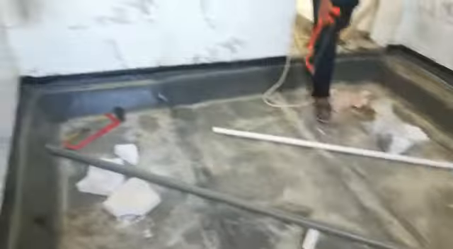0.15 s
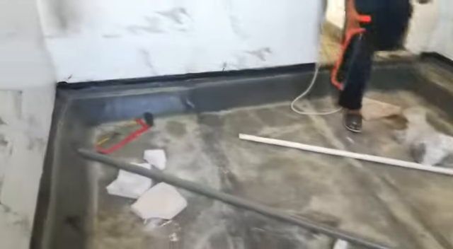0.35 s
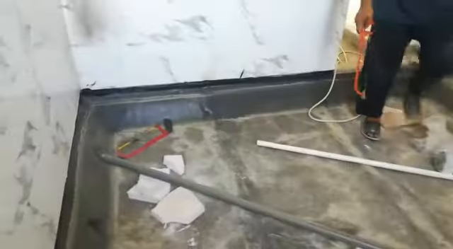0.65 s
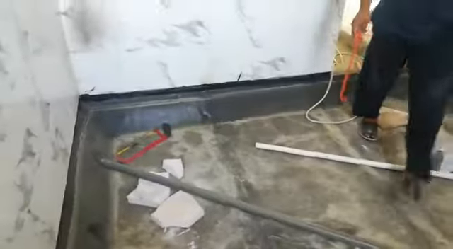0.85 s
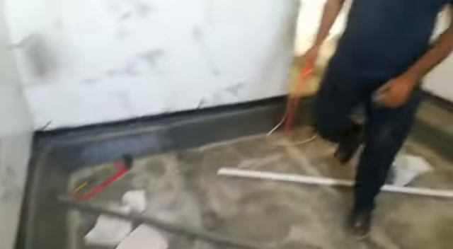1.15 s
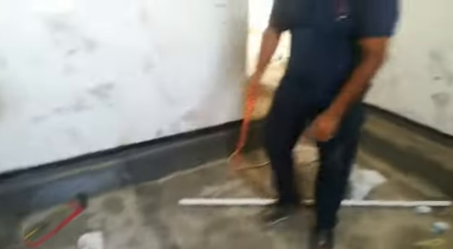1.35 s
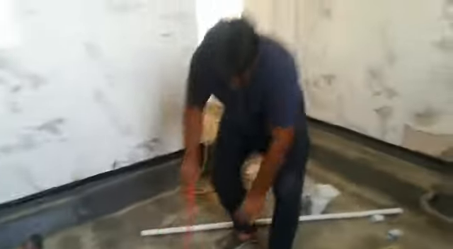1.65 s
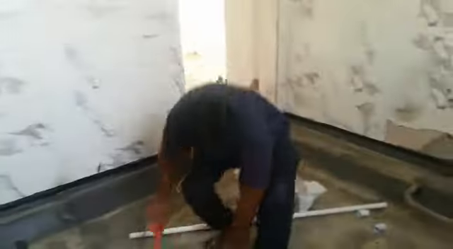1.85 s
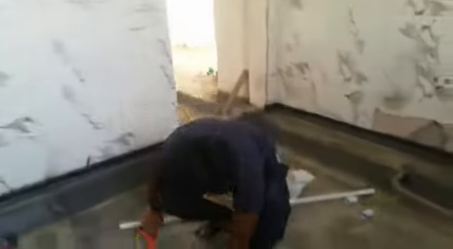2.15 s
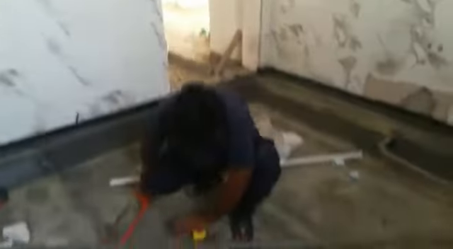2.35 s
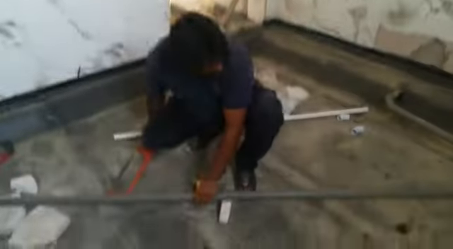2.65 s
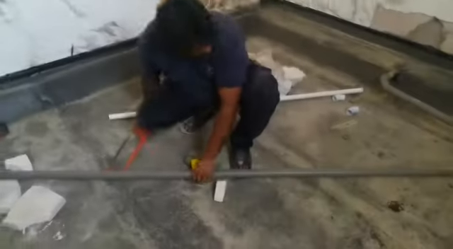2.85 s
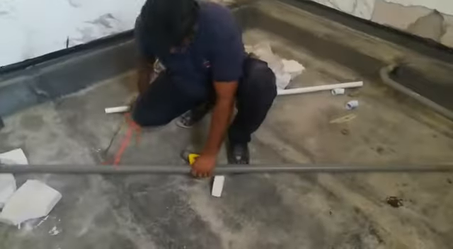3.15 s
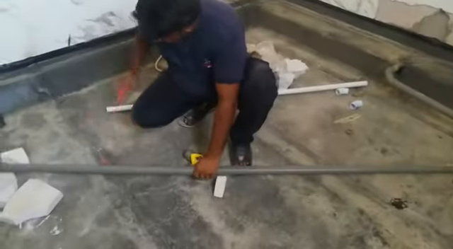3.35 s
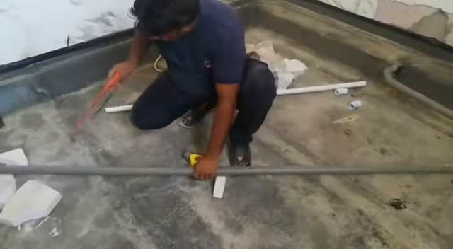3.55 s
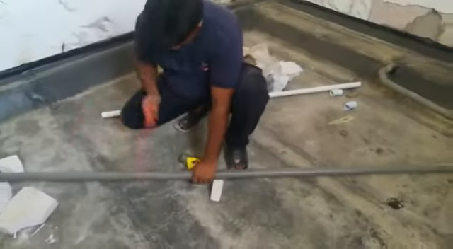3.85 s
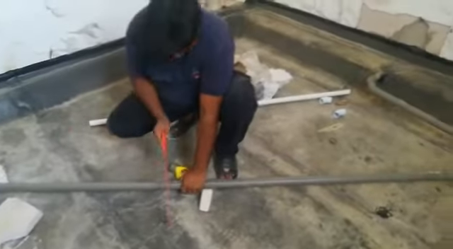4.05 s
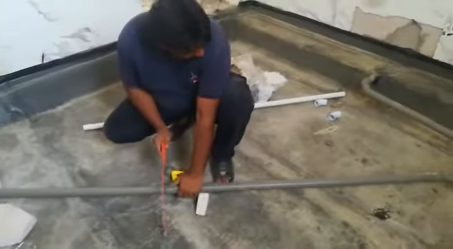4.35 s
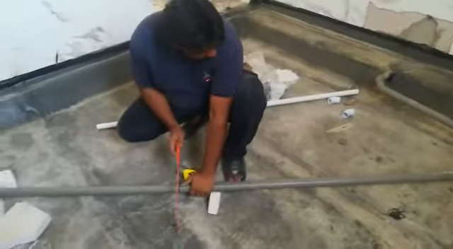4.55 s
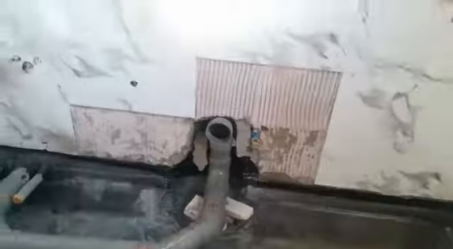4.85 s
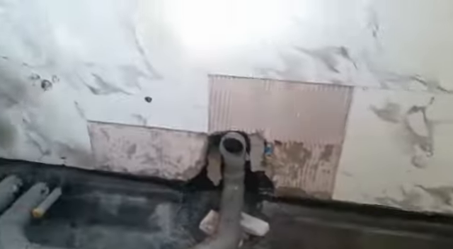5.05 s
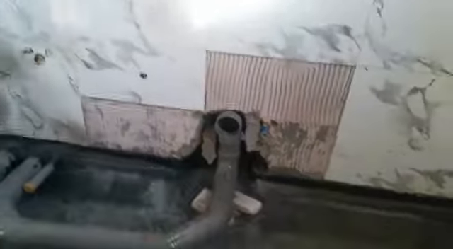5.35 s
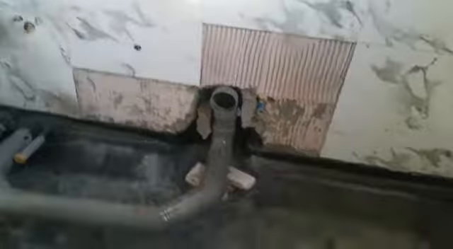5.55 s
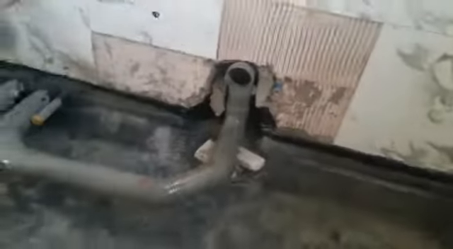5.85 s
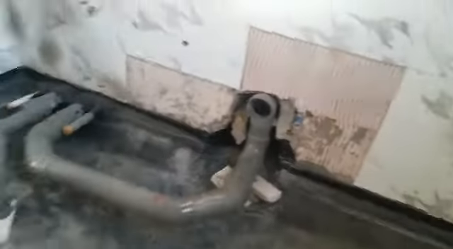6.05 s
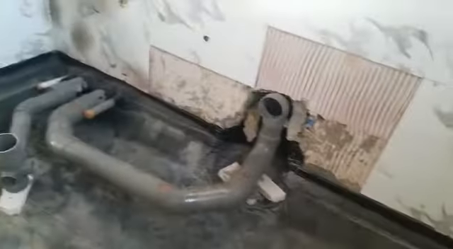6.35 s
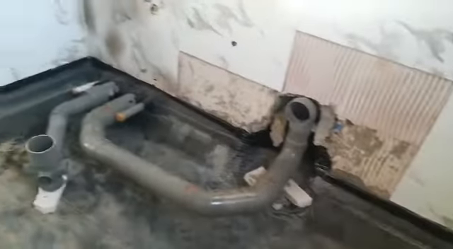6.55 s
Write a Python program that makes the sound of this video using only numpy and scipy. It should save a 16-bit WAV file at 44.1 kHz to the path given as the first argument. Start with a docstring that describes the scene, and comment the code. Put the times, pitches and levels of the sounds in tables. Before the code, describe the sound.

Loud hollow plastic clatter comes first, ringing through an empty hard-walled room. After a short lull, irregular footsteps and knocks grow crisper and nearer. Then come a dull pipe thump with light metal taps, a brief singing slide of saw teeth, and two more taps. Near the end the echo shortens and the hum drops; soft microphone bumps lead to dry scrapes, the strongest close to the end. Handheld microphone with faint rumble.

```python
"""A long plastic pipe lands, bounces and chatters on the concrete floor of a bare, echoing room; a worker
then steps up and handles it, his hacksaw slides and is set on the pipe, and soft bumps and scrapes follow.
Blows are short filtered pulses with reflections and echo; pipe, saw frame and blade ring in decaying modes.
Scrapes, chatter and sliding teeth are random trains of ticks; cloth, hum and booms are shaped noise."""
import sys
import numpy as np
from scipy import signal
from scipy.fft import rfft, irfft
from scipy.io import wavfile

SR = 44100
rng = np.random.default_rng(int(sys.argv[2]) if len(sys.argv) > 2 else 0)


def file_out(sig):
    """Save sig as 16-bit WAV at sys.argv[1]."""
    # one column per channel
    cols = np.atleast_2d(sig).T
    # limit, then scale
    lim = np.clip(cols, -1, 1)
    pcm = np.round(lim * 32767).astype(np.int16)
    wavfile.write(sys.argv[1], SR, pcm)


N = 295029
TIME = np.arange(N) / SR   # s
AGE = TIME[:SR]   # s since the start of one sound
NARROW_FROM_S = 4.55   # from here on the sounds come from a tighter corner with a shorter echo


def from_db(db):
    """Amplitude ratio: 20 dB is a factor of ten in pressure."""
    return 10 ** (np.asarray(db) / 20)


def rms_one(x):
    """Normalisation to unit root-mean-square amplitude."""
    return x / np.sqrt(np.mean(x ** 2) + 1e-20)


def at_hz(points, hz):
    """Interpolation on a logarithmic frequency axis, on which equal musical intervals are equally wide."""
    known, values = np.transpose(points)
    return np.interp(np.log(np.maximum(hz, 1)), np.log(known), values)


def add(out, s, sound):
    """Superposition: a stereo sound is summed in from time s."""
    start = max(0, round(s * SR))
    out[:, start:start + sound.shape[1]] += sound[:, :N - start]


def pulse(*spectra, size=4096):
    """Minimum phase: folding the cepstrum gives a causal pulse with the summed dB spectra."""
    hz = np.fft.rfftfreq(size, 1 / SR)
    spectrum_db = sum(at_hz(points, hz) for points in spectra)
    cepstrum = irfft(np.log(from_db(spectrum_db)))
    cepstrum[1:size // 2] *= 2
    cepstrum[size // 2 + 1:] = 0
    return irfft(np.exp(rfft(cepstrum)))


def through(x, response):
    """Linear filtering: convolution with an impulse response, keeping the whole tail."""
    return signal.fftconvolve(np.atleast_2d(x), np.atleast_2d(response), axes=1)


def contact(touch, weight_db, hard_db):
    """Contact mechanics: a heavier touch excites more of the lows, a harder one more of the highs."""
    bass, body, edge, treble = touch
    # share of the weight that reaches 1 kHz, and of the hardness that reaches 4 kHz
    body_share, edge_share = 0.8, 0.49
    return tint(bass + weight_db, body + body_share * weight_db, edge + edge_share * hard_db, treble + hard_db)


def tint(bass_db, body_db, edge_db, treble_db):
    """Spectral balance: four levels stand beside a fixed one near 2 kHz, as (Hz, dB) points."""
    mid_db = -10.5
    return [(450, bass_db), (800, body_db), (1250, body_db), (1800, mid_db), (2400, mid_db),
            (3100, edge_db), (4500, edge_db), (7000, treble_db)]


def resonance(hz, lift_db, width):
    """Resonance: one broad peak, as (Hz, dB) points."""
    return [(hz / (1 + width), 0), (hz, lift_db), (hz * (1 + width), 0)]


def spread(mid_side):
    """Spatial coherence: two close microphones hear a diffuse field alike only in the bass."""
    # stereo width of the diffuse field: f/Hz, side over mid/dB
    side_over_mid = [(30, -31.5), (60, -27), (125, -18.5), (250, -12.5), (500, 2.5), (1000, -1.5),
                     (4000, 1), (12000, 1)]
    side = through(mid_side[1], pulse(side_over_mid))[0, :mid_side.shape[1]]
    return mid_side[0] + side * np.array([[1], [-1]])


def room(s):
    """Reverberation from a new spot at time s: each octave band of noise decays at its own rate."""
    # reverberation time of the open room: f/Hz, T60/s
    decay_times = [(100, 0.97), (500, 0.99), (1400, 0.71), (3700, 0.67), (9700, 0.57), (15000, 0.34)]
    liveness = 0.68 if s > NARROW_FROM_S else 1   # factor on the reverberation time
    white, out = rng.standard_normal((2, 2, SR)), 0
    edges = 70 * 2. ** np.arange(9)   # Hz
    for k, band in enumerate(zip(edges, edges[1:])):
        noise = signal.sosfilt(signal.butter(2, band, "band", fs=SR, output="sos"), white[k % 2])
        t60 = liveness * at_hz(decay_times, np.sqrt(band[0] * band[1]))
        out = out + noise * np.exp(-np.log(1000) * AGE / t60)
    return spread(out)


def in_room(s, x, direct_db):
    """Direct and reverberant field: the sound itself plus an echo of unit energy."""
    response = rms_one(room(s)) / np.sqrt(SR)
    response[:, 0] += from_db(direct_db)
    return through(x, response)


def blow(s, spectra, crack_db, crack_s):
    """Impulse response: a click excites close early reflections and then the room's echo."""
    floor_echo = 0.35   # strength of the floor's reflection
    crack = from_db(crack_db) * spread(rng.standard_normal((2, SR))) * np.exp(-AGE / crack_s)
    click = pulse(*spectra)
    # the floor's reflection follows at once and combs each click differently
    delay = round(rng.uniform(0.0015, 0.004) * SR)
    click = click + floor_echo * np.pad(click, (delay, 0))[:len(click)]
    return through(crack + room(s), click / np.hypot(1, floor_echo))[:, :SR]


def ring(modes, tone, t60, uneven_db):
    """Modal synthesis: a blow excites every mode anew, with its own phase at each microphone."""
    attack_s = 0.00074   # a ring builds up briefly
    detune = 0.0011   # the place of contact shifts each mode by about this share
    hz, level_db = np.transpose(modes)
    uneven = uneven_db * rng.standard_normal(len(hz))
    strength = from_db(level_db - level_db.max() + at_hz(tone, hz) + uneven)
    phases = np.exp(2j * np.pi * rng.random((2, len(hz))))
    hz = hz * (1 + detune * rng.standard_normal(len(hz)))
    fade = (1 - np.exp(-AGE / attack_s)) * np.exp(-np.log(1000) * AGE / t60)
    return ((strength * phases) @ np.exp(2j * np.pi * np.outer(hz, AGE))).real * fade


def struck(hits, touch, colour, modes, crack_db, thud_db, ring_db, t60):
    """Struck body: every hit gives a broadband thud and sets the modes ringing."""
    out = np.zeros((2, N))
    for s, db, weight_db, hard_db in hits:
        tone = contact(touch, weight_db, hard_db)
        add(out, s, from_db(db + thud_db) * blow(s, [colour, tone], crack_db, crack_s=0.006))
        add(out, s, from_db(db + ring_db) * ring(modes, tone, t60, uneven_db=0.0))
    return out


def grains(per_s, size_db):
    """Stick-slip friction: tiny slips at random times and of uneven size; rms 1."""
    born = np.flatnonzero(rng.random(N) < per_s / SR)
    size = from_db(size_db * np.minimum(rng.exponential(1, len(born)), 4))
    out = np.zeros(N)
    out[born] = rng.choice([-1, 1], len(born)) * size
    return rms_one(out)


def swell(s, half_s):
    """Gaussian envelope: a push grows and lets go smoothly around time s."""
    return np.exp(-2 * ((TIME - s) / half_s) ** 2)


def steady_noise(spectrum):
    """Stationary random field: coloured stereo noise of unit rms."""
    return rms_one(spread(through(rng.standard_normal((2, N)), pulse(spectrum))[:, :N]))


def background():
    """Ambient noise: a broad bed, the building's distant hum and the hand moving on the microphone."""
    # spectrum of the bed: f/Hz, relative density/dB
    bed = [(12, -51.5), (20, -17), (70, -8.5), (139, -25), (174, -20), (377, -32.5), (540, -39.5),
           (1140, -30.5), (2100, -35), (2280, -33), (2620, -37), (4690, -39), (7720, -46.5), (15000, -57)]
    # the hand shifts its grip on the microphone: t/s, half length/s, level/dB
    grips = [(1.45, .8, -61.5), (5.308, .2, -53), (5.613, 0.093, -54), (6.35, 0.49, -60.5)]
    bed_db, hum_db, rumble_db, rustle_db = -61, -61.5, -70.5, -67.5   # rumble and rustle: hand at rest
    corner_hum_db, corner_rustle_db = -16.5, 5   # changes in the tight corner
    in_corner = TIME > NARROW_FROM_S
    hum = from_db(hum_db + corner_hum_db * in_corner) * steady_noise(
        [(35, -24.5), (70, 1.5), (125, -11.5), (250, -44.5)])
    grip = from_db(rumble_db) + sum(from_db(db) * swell(s, half_s) for s, half_s, db in grips)
    rumble = grip * steady_noise([(10, -16.5), (28, 10.5), (55, -8.0), (110, -28.5), (400, -70.0)])
    rustle = from_db(rustle_db + corner_rustle_db * in_corner) * steady_noise(
        [(60, -15.5), (120, -5), (185, 0), (270, -6.5), (500, -19.0), (2000, -48.0)])
    return from_db(bed_db) * steady_noise(bed) + hum + rumble + rustle


def chatter_bout(s, length_s, db):
    """Energy loss: chatter sets in quickly, sags as the pipe loses energy, and stops."""
    attack_s, sag_db_per_s, release_s = 0.0078, 36, 0.015
    since = TIME - s
    outside = np.maximum(-since, 0) / attack_s + np.maximum(since - length_s, 0) / release_s
    return from_db(db - sag_db_per_s * np.maximum(since, 0)) * np.exp(-outside)


def pipe():
    """Modal vibration of a tube: bounces and the rattle between them both excite the wall's modes."""
    # blows on the pipe: t/s, level/dB, weight/dB, hardness/dB
    landings = [(0.143, -29.5, 7, -3.5), (0.175, -32, 10.5, -1), (0.35, -8.5, 1.5, -14),
                (0.378, -5.5, 0.5, 1.5), (0.407, -10, -2.5, -1), (0.549, -13.5, 1.5, 1), (0.58, -13, -5, 0),
                (0.672, -9, 2, 9.5), (0.695, -4, -6.5, 2), (0.726, -14.5, 0.5, 4), (0.76, -7, -9, -10)]
    # usual colour of a blow: bass/dB, body/dB, edge/dB, treble/dB
    usual_touch = (-30.5, -13, -10.5, -19.5)
    # the wall radiates well only above its first ovalling mode: f/Hz, level/dB
    wall_colour = [(60, -16), (180, 17), (590, 2), (830, 8), (1150, 10.5), (1750, 4), (3000, 6.5),
                   (3500, 2.5), (5500, 1), (6300, 4), (7300, -7.5), (8000, -2.5), (10200, -15),
                   (15000, -33)]
    # ring of the pipe wall: f/Hz, relative level/dB
    wall_modes = [(804, -5.5), (936, -2.5), (1054, -0.5), (1096, 2.5), (1157, -2), (1255, -6.5),
                  (1288, 0.5), (1648, -2.5), (1922, -12.5), (2177, -5), (2256, -7), (2423, -7.5),
                  (2584, -11.5), (2638, -15), (2994, -4), (3047, -5.5), (3097, -5), (3289, -10), (3628, -9),
                  (4091, -12.5), (4344, -14.5), (4613, -9), (5992, -5), (6319, -5.5), (6525, -17.5),
                  (6815, -17.5), (7931, -6), (8484, -18), (8893, -27)]
    # the pipe chatters along the floor: start t/s, length/s, level/dB
    bouts = [(0.131, 0.2, -40.5), (0.417, 0.14, -28.5), (0.693, 0.15, -28.5)]
    bounces = struck(landings, usual_touch, wall_colour, wall_modes,
                     crack_db=-4.5, thud_db=-3.0, ring_db=-7, t60=0.6)
    light_touch = tint(-26.5, -7, -7.5, -16.0)
    ticks = grains(per_s=420, size_db=3.5) * sum(chatter_bout(*row) for row in bouts)
    chatter = in_room(0, through(ticks, pulse(wall_colour, light_touch)), direct_db=-9.5)[:, :N]
    wall_ring = rms_one(ring(wall_modes, light_touch, t60=0.45, uneven_db=4.5)) / np.sqrt(SR)
    singing = through(ticks, wall_ring)[:, :N]
    return bounces + from_db(8.5) * chatter + from_db(-1.5) * singing


def thuds():
    """Low-frequency reverberation: each heavy contact wakes a boom in the room that dies away slowly."""
    # landings and heavy steps thud through the floor: t/s, level/dB
    heavy_contacts = [(0.136, -48), (0.38, -64), (0.69, -46), (1.455, -51), (1.971, -52), (2.869, -40.5),
                      (5.165, -52), (6.42, -54.5)]
    attack_s, t60 = 0.017, 1.09   # s
    boom = steady_noise([(60, -5.5), (130, -1.5), (260, -2.5), (500, -12), (2000, -43.0)])
    fade = (1 - np.exp(-AGE / attack_s)) * np.exp(-np.log(1000) * AGE / t60)
    level = np.zeros((2, N))
    for s, db in heavy_contacts:
        add(level, s, from_db(db) * fade[None])
    return level * boom


def scrapes():
    """Dry friction: grit slips in dense ticks while the pressure swells and lets go."""
    # gritty scrapes: t of hardest pressure/s, half length/s, level/dB, weight/dB, hardness/dB, resonance f/Hz
    strokes = [(0.154, 0.029, -44.5, 15, 8.5, 6600), (0.28, 0.091, -50, -5, 11.5, 5200),
               (2.02, 0.051, -53, 19, -4, 2300), (3.715, 0.17, -67, -14, -0.5, 4460),
               (4.603, .027, -55.5, 6.5, 5.5, 5020), (4.912, .085, -54, 0, 2.5, 5380),
               (4.954, .05, -52, -9, -12, 1710), (5.032, 0.056, -41.5, -1, -6.5, 2150),
               (5.158, .028, -30.5, -13, -0.5, 2070), (5.188, 0.018, -27.5, -2, 0, 1800),
               (5.582, 0.096, -57, 9, 3, 3930), (5.818, 0.098, -59.5, 3, 7.5, 5900),
               (6.008, .1, -53.5, 4, -2.5, 1200), (6.202, 0.069, -46.5, 6.5, -2, 1500),
               (6.314, 0.069, -30, 1.5, -1.5, 1320), (6.367, 0.06, -24.5, 7.5, -2, 955),
               (6.493, 0.085, -46.5, 4, -3, 1590)]
    # usual colour of a scrape: bass/dB, body/dB, edge/dB, treble/dB
    usual_touch = (-29, -10, -7.5, -11)
    # common colour of all scrapes: f/Hz, level/dB
    grit_colour = [(60, -5.5), (200, 2), (480, -3), (900, -5.5), (1900, 4), (3000, -2.5), (4500, -1),
                   (7000, -2.5), (10500, -19.5), (15000, -28)]
    left_over_right_db = 2.5
    out, grit = np.zeros((2, N)), grains(per_s=2500, size_db=2.5)
    for s, half_s, db, weight_db, hard_db, hz in strokes:
        pressure = swell(s, half_s)
        live = np.flatnonzero(pressure > 1e-3)
        tone = contact(usual_touch, weight_db, hard_db)
        tick = pulse(grit_colour, tone, resonance(hz, lift_db=3.5, width=0.21))
        rasp = through((grit * pressure)[live], tick)
        add(out, live[0] / SR, from_db(db + 10.5) * in_room(s, rasp, direct_db=-3.5))
    return out * from_db([[left_over_right_db / 2], [-left_over_right_db / 2]])


def clothes():
    """Fibre friction: fabric slides on fabric with a light, very high hiss."""
    # clothes swish as the worker moves: t/s, half length/s, level/dB
    swishes = [(1.057, 0.09, -56), (1.577, 0.066, -54), (1.79, 0.11, -58), (2.61, 0.1, -64)]
    fibres = steady_noise([(3000, -17), (7000, -2), (10000, -6.5), (14500, -17), (16000, -17)])
    return fibres * sum(from_db(db) * np.exp(-((TIME - s) / half_s) ** 2) for s, half_s, db in swishes)


def knocks():
    """Impact on a massive floor: shoes and tools meet the concrete in short, resonant knocks."""
    # steps and knocks: t/s, level/dB, weight/dB, hardness/dB, resonance f/Hz
    steps = [(1.4527, -36.5, 4.5, 9.5, 2150), (1.5595, -33, -2.5, 1, 5100), (1.703, -30.5, -8, 2.5, 1940),
             (1.7198, -31.5, -4.5, 8, 2480), (1.9708, -39, 17, -6, 844), (2.088, -44, 16.5, -7, 940),
             (2.109, -36.5, 7, -4, 970), (2.1257, -31.5, -12, -3, 3060), (2.1902, -21, -1.5, -2, 3000),
             (2.3642, -31.5, -3, -2, 1860), (2.4265, -21.5, -9, -7.5, 1900), (2.4406, -30, -21, -6, 2140),
             (5.129, -27, -26, -1, 2120), (5.9374, -44, 10.5, -7, 800), (6.0456, -47, 14.5, 2.5, 1360)]
    # usual colour of a knock: bass/dB, body/dB, edge/dB, treble/dB
    usual_touch = (-21.5, -14.5, -11, -17.5)
    # common colour of all knocks: f/Hz, level/dB
    floor_colour = [(60, 4.5), (170, 10), (450, 5), (900, 6), (2000, 5), (4300, 3.5), (7000, 2.5),
                    (10000, -11), (15000, -36)]
    # the worker's knocks grow crisper as he comes nearer: t/s, first reflections over the room's echo/dB
    nearness = [(1.45, -5), (1.97, 8)]
    out = np.zeros((2, N))
    for s, db, weight_db, hard_db, hz in steps:
        tone = contact(usual_touch, weight_db, hard_db)
        spectra = [floor_colour, tone, resonance(hz, lift_db=5.5, width=0.26)]
        crack_db = np.interp(s, *np.transpose(nearness))
        add(out, s, from_db(db + 1.5) * blow(s, spectra, crack_db, crack_s=0.0034))
    return out


def pipe_bending(s, db, start_hz, end_hz, glide_s, fade_s):
    """Dispersion: low bending waves run more slowly along the pipe, so the thump falls in pitch."""
    hz = end_hz + (start_hz - end_hz) * np.exp(-AGE / glide_s)
    fade = (1 - np.exp(-AGE / 0.0086)) * np.exp(-AGE / fade_s)
    wave = np.sin(2 * np.pi * np.cumsum(hz) / SR) * fade
    out = np.zeros((2, N))
    add(out, s, from_db(db) * in_room(s, wave, direct_db=5.5))
    return out


def saw_taps():
    """Modal vibration of a frame: the hacksaw rings each time it is put against the pipe."""
    # taps of the saw: t/s, level/dB, weight/dB, hardness/dB
    taps = [(2.869, -28, -2, 2), (2.921, -33, 1.5, 2.5), (4.263, -33, -3.5, 2.5),
            (4.309, -32.5, -1.5, -6.5)]
    # usual colour of a tap: bass/dB, body/dB, edge/dB, treble/dB
    usual_touch = (-21, -9.5, -10, -17.5)
    # common colour of all taps: f/Hz, level/dB
    frame_colour = [(60, -7), (180, 10), (350, 4), (520, 5), (760, 11), (1050, 7.5), (1400, 7), (2000, 8),
                    (2400, 6), (2900, -1.5), (4000, 0.5), (6500, -0.5), (10000, -12), (15000, -37)]
    # ring of the hacksaw's frame: f/Hz, relative level/dB
    frame_modes = [(839.8, -66), (1136, -59), (1475, -71.5), (1820, -64), (2013, -88), (2099, -52),
                   (3531, -72), (3779, -59), (5076, -81), (5518, -83), (5631, -83), (5954, -76),
                   (6778, -54), (7294, -84)]
    return struck(taps, usual_touch, frame_colour, frame_modes,
                  crack_db=-3, thud_db=-0.5, ring_db=-10.0, t60=0.68)


def bumps(length_s):
    """Damped oscillation: each soft push lets the microphone's housing swing for a few cycles."""
    # soft bumps on the housing: t/s, f/Hz, level/dB
    pushes = [(3.139, 193, -44.5), (4.598, 264, -44.5), (4.623, 247, -46.5), (4.666, 260, -47),
              (4.69, 274, -45), (4.711, 268, -54.5), (4.786, 261, -59)]
    out = np.zeros(N)
    for s, hz, db in pushes:
        envelope = np.exp(-((TIME - s) / length_s) ** 2)
        out += from_db(db) * envelope * np.sin(2 * np.pi * hz * (TIME - s))
    return out


def blade():
    """Forced vibration: fine teeth slide with a thin hiss and keep the steel strip ringing."""
    # ring of the saw blade: f/Hz, bandwidth/Hz, relative level/dB
    strip_modes = [(2670, 34, -10), (3390, 96, -13), (3920, 39, -4), (4180, 37, -5), (4790, 24, 0),
                   (6360, 130, -11), (7070, 27, -7), (7770, 44, -17), (8360, 39, -19), (9520, 46, -14),
                   (10700, 36, -16), (11200, 37, -15), (11700, 44, -20), (13200, 51, -25)]
    middle_s, half_s, slide_db = 3.328, 0.12, -52   # the blade's one slide
    teeth, steel = grains(per_s=1000, size_db=2.0), 0
    for hz, width_hz, db in strip_modes:
        r = np.exp(-np.pi * width_hz / SR)   # pole radius of a two-pole resonator
        poles = [1, -2 * r * np.cos(2 * np.pi * hz / SR), r * r]
        steel = steel + from_db(db) * signal.lfilter([1 - r, 0, r - 1], poles, teeth)
    hiss_colour = [(1500, -14), (3550, -16), (3900, 9), (4900, 11), (5250, -21), (9500, -9), (10100, -18),
                   (11200, -13), (14000, -14)]
    hiss = through(teeth, pulse(hiss_colour))[0, :N]
    strip = rms_one(steel) + from_db(-5) * rms_one(hiss)
    slide = strip * from_db(slide_db) * swell(middle_s, half_s)
    return in_room(middle_s, slide, direct_db=2.5)[:, :N] * from_db([[-6], [-3.5]])   # left, right


def scene():
    """Superposition: all sources sum linearly in one sound field."""
    falling_pipe = pipe() * from_db([[-0.6], [0.6]])   # left, right
    thump = pipe_bending(s=2.867, db=-43.5, start_hz=385.5, end_hz=149.6, glide_s=0.052, fade_s=0.12)
    saw = saw_taps() + blade()
    handling = knocks() + thuds() + scrapes() + clothes()
    return background() + falling_pipe + handling + thump + saw + bumps(length_s=0.01)


def record(dry):
    """Band limitation: a steep elliptic low-pass cuts the top."""
    cutoff_hz = 15750
    return signal.sosfilt(signal.ellip(10, 0.2, 80, cutoff_hz, fs=SR, output="sos"), dry)


dry = scene()
out = record(dry)
file_out(out)
```